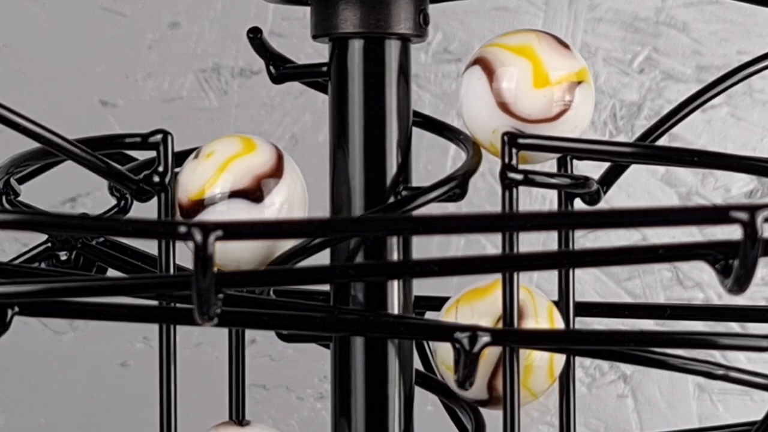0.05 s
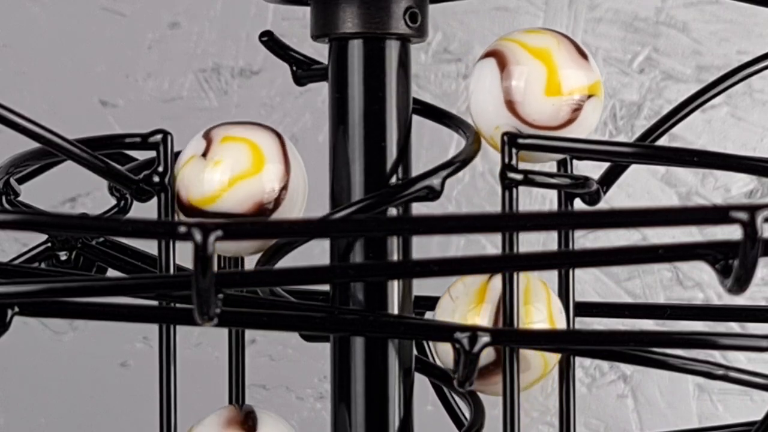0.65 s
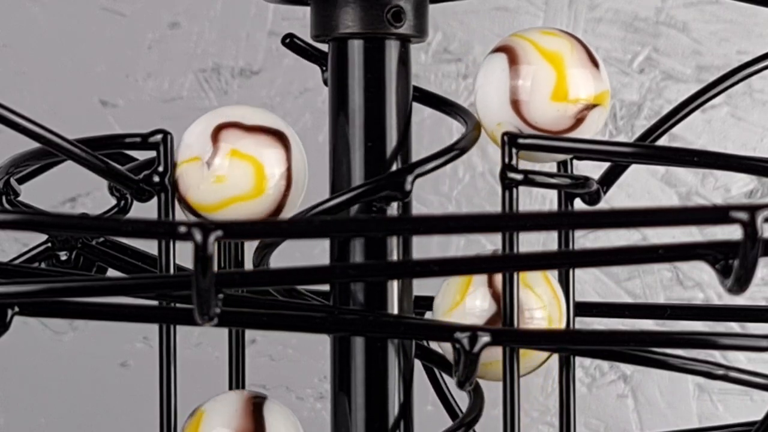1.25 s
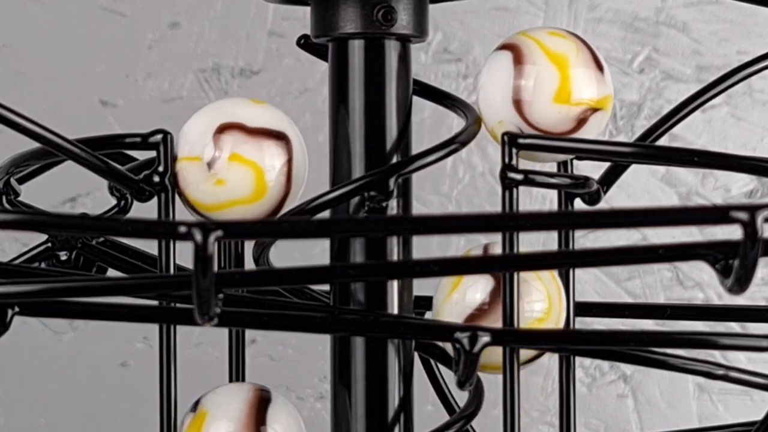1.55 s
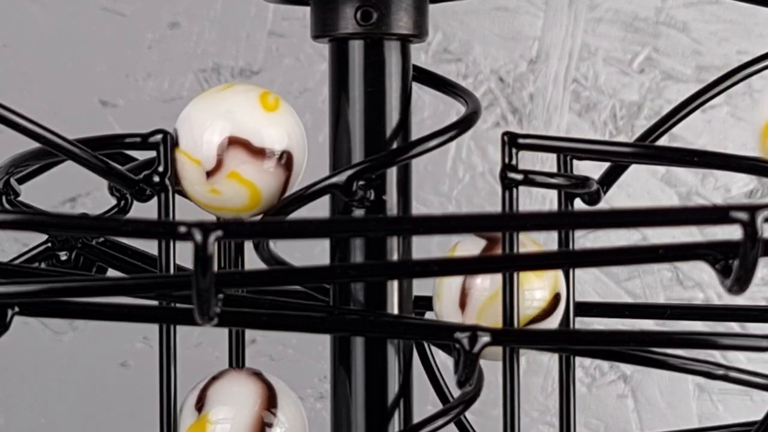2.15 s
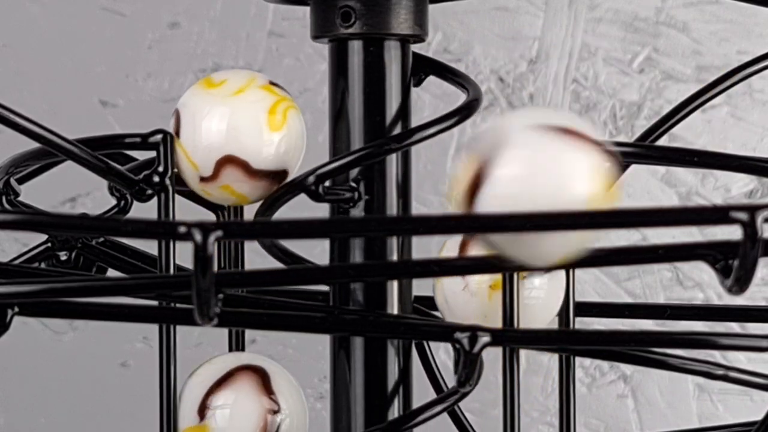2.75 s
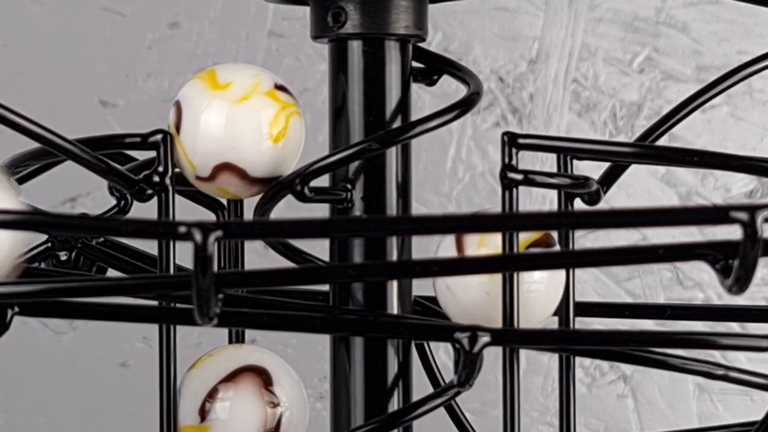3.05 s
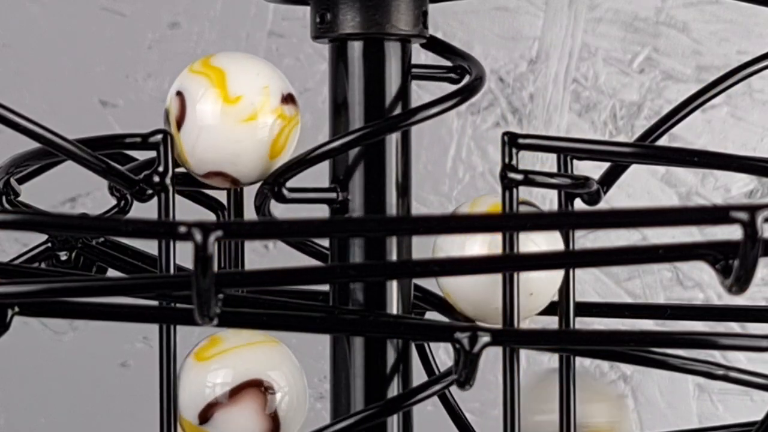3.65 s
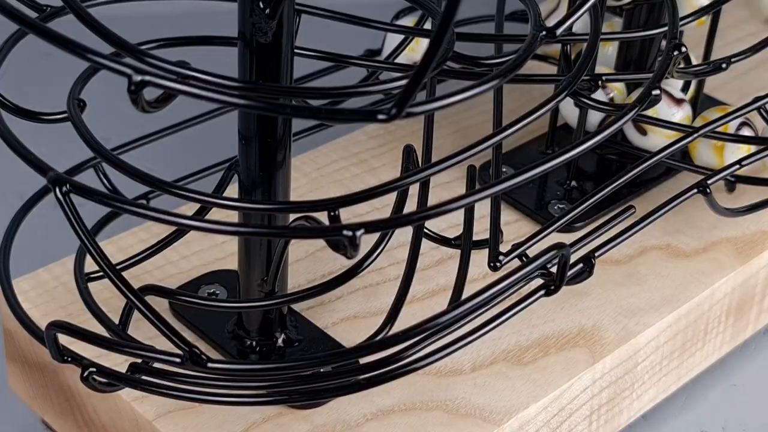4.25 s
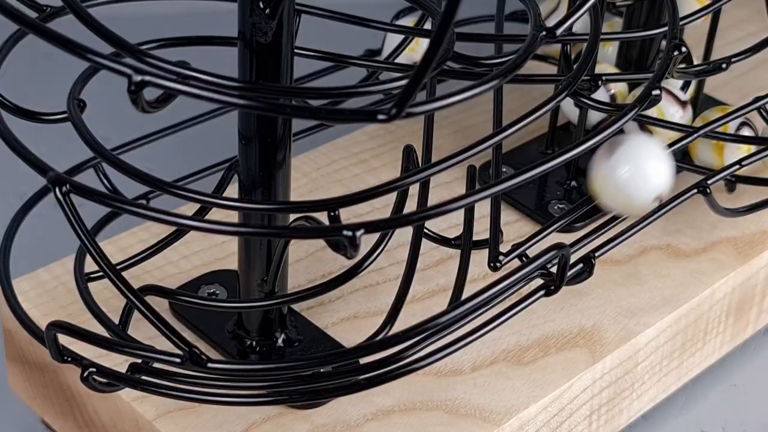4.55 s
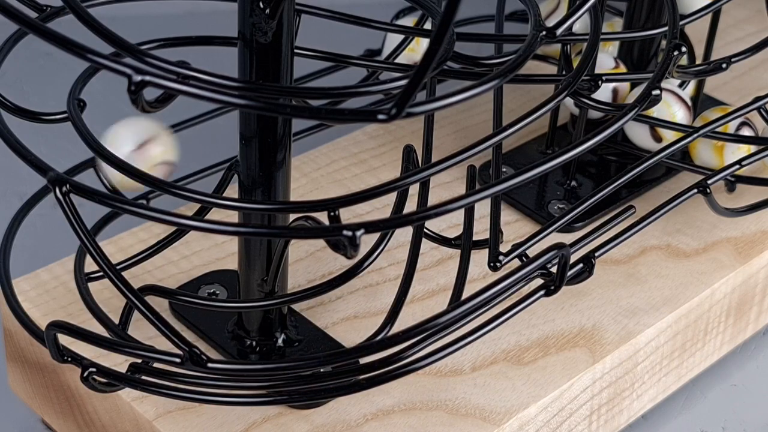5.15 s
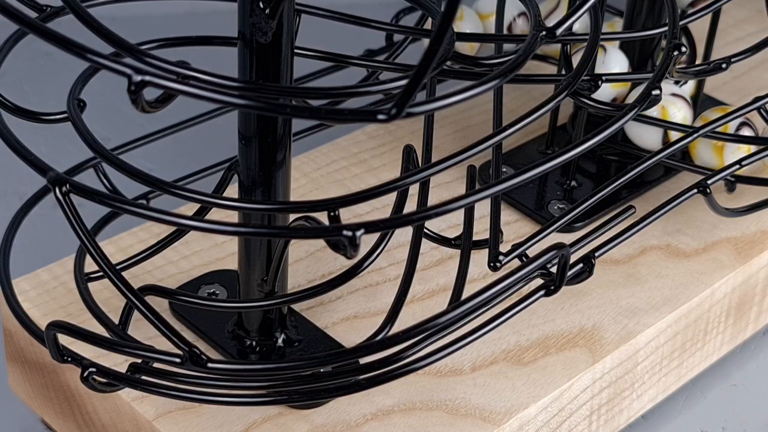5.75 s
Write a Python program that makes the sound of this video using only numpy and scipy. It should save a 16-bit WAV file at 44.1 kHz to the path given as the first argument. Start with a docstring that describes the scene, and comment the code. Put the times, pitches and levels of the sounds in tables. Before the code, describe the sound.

Glass marbles clack sharply, then roll along a wire track, whirring and rattling ever louder over a faint motor hum.

```python
"""Sharp clacks come first: glass marbles drop and meet on a steel wire track, close by in a small room.
Rolling over the rough rails, they whirr, swell in the bends and chatter across the welded joints.
Each contact excites the modes of the wire frame, and the wooden board beneath rumbles in forced vibration.
The geared motor of a screw lift hums faintly throughout; twice a marble tips gently onto or off the lift.
The rolling grows louder in the second half and ends in more clacks."""
import sys
import numpy as np
from scipy import signal
from scipy.fft import rfft, irfft
from scipy.io import wavfile
from scipy.ndimage import uniform_filter1d

SR = 44100
rng = np.random.default_rng(int(sys.argv[2]) if len(sys.argv) > 2 else 0)


def write(x):
    x = np.atleast_2d(x).T
    wavfile.write(sys.argv[1], SR, np.round(np.clip(x, -1, 1) * 32767).astype(np.int16))


N = 260190
TIME = np.arange(N) / SR


def undb(db):
    """Amplitude ratio of a level in decibels."""
    return 10 ** (np.asarray(db) / 20)


def unit(x):
    """Normalisation to an rms of 1."""
    return x / np.sqrt(np.mean(x ** 2))


def on_log_axis(hz, points):
    """Interpolation of (frequency [Hz], value) points over log frequency."""
    at, value = np.transpose(points)
    return np.interp(np.log(hz + 1), np.log(at), value)


def through(x, response):
    """Convolution with an impulse response, channel by channel."""
    return signal.fftconvolve(np.atleast_2d(x), np.atleast_2d(response), axes=1)[:, :np.shape(x)[-1]]


def colour(x, points, size=4096):
    """Minimum-phase filtering by a curve of (frequency [Hz], gain [dB]) points."""
    gain = undb(on_log_axis(np.fft.rfftfreq(size, 1 / SR), points))
    cepstrum = irfft(np.log(gain))
    cepstrum[1:size // 2] *= 2
    cepstrum[size // 2 + 1:] = 0
    return through(x, irfft(np.exp(rfft(cepstrum))))


def fade(t, t60):
    """Exponential decay, 60 dB down at t60."""
    return np.exp(-np.log(1000) * t / t60)


def wander(per_s):
    """Slow random fluctuation with a spread near 1."""
    knots = rng.standard_normal(2048)
    return np.interp(TIME * per_s, np.arange(len(knots)), knots)


def stereo_noise(size, side_db=1.3):
    """Partly correlated white noise, set by its side-to-mid ratio."""
    mid, side = rng.standard_normal((2, size))
    return unit(np.array([mid + undb(side_db) * side, mid - undb(side_db) * side]))


def add(out, s, sound):
    """Superposition of a sound starting at time s."""
    start = max(int(s * SR), 0)
    out[:, start:start + sound.shape[1]] += sound[:, :N - start]


def ring(x, modes):
    """Modal resonance: each mode is a damped cosine whose bandwidth sets its decay."""
    t = TIME[:SR // 2]
    response = sum(undb(db) * 2 * np.pi * width / SR * np.exp(-np.pi * width * t)
                   * np.cos(2 * np.pi * hz * t) for hz, width, db in modes)
    return through(x, response)


def blow(t60, rise_s=0.00032):
    """Impact transient: waves reflect to and fro in the wires as a noise burst of unit energy."""
    t = TIME[:SR // 8]
    return unit(stereo_noise(len(t)) * fade(t, t60) * (1 - np.exp(-t / rise_s))) / np.sqrt(len(t))


def taps(size, per_s, scatter_db, t60=0.05):
    """Shot noise: tiny impacts of random time and strength, each a short burst."""
    struck = rng.random(size) < per_s / SR
    strength = undb(scatter_db * rng.standard_normal(size).clip(-2, 2))
    energy = through(struck * strength ** 2, fade(TIME[:SR // 20], t60) ** 2)
    return np.sqrt(np.abs(energy)) * stereo_noise(size)


# Impacts of glass on glass or steel: (time [s], level [dB], body re treble [dB], room send [dB])
CLACKS = [(0.0004, -11.5, 0, 7), (0.0054, -4.5, -2, -11), (0.1275, -10, 2.5, -2.5),
          (0.2832, -11, 0.5, -1.5), (0.5538, -7, 1, 3.5), (0.557, -4.5, -11, -12), (5.412, -5, -10.5, -6),
          (5.598, -7.5, 3, -1.5), (5.6347, -5, 1.5, -5)]
# Spectrum of a clack: (frequency [Hz], gain [dB])
CLACK_COLOUR = [(150, -43.5), (400, -18), (540, -19), (680, -5), (900, -15.5), (1300, -3.5), (1650, -6),
                (1950, -8.5), (2700, -3), (4000, -4), (6500, -0.5), (8200, -4.5), (10000, -10),
                (16000, -20)]
# Thinning of the direct click; the low knock comes later, from frame and room: (frequency [Hz], gain [dB])
DIRECT_COLOUR = [(700, -11.5), (1500, -3.5), (4000, -3)]

def clacks(gain_db=14.5, room_db=-2.5, pan_db=-0.1, crack_db=-0.5, echo_delay_s=0.005):
    """Hard impact: a broadband crack and short ringing; returns the direct sound and the room's feed."""
    direct, to_room = np.zeros((2, 2, N))
    for s, db, body_db, send_db in CLACKS:
        tilt = [(1600, body_db), (5000, 0)]
        crack = undb(crack_db) * blow(t60=0.02, rise_s=0.0006)
        add(direct, s, colour(crack + blow(t60=0.058), tilt) * undb(db + gain_db))
        contact = colour(signal.unit_impulse(SR // 8), tilt)
        add(to_room, s + echo_delay_s, contact * undb(db + gain_db + room_db + send_db))
    direct = colour(direct, DIRECT_COLOUR) * undb(np.array([[pan_db], [-pan_db]]) / 2)
    return colour(direct, CLACK_COLOUR), colour(to_room, CLACK_COLOUR)


# Modes of the wire frame: (frequency [Hz], bandwidth [Hz], gain [dB])
WIRE_MODES = [(1184, 70, 4.5), (1331, 40, 6), (1405, 70, 1.5), (1611, 53, 7), (1691, 24, 6), (2261, 30, 9),
              (2404, 45, 6.5), (2637, 55, 5), (3010, 51, 4), (3930, 25, 1), (6220, 45, 3), (7080, 35, 0.5),
              (8350, 25, 1)]

def wire_frame(x, count=40, overtone_width_hz=20, overtone_db=3.5):
    """Resonance: the frame rings at its modes, and each length of wire adds a thin treble overtone."""
    overtones_hz = 3300 + 12000 * (np.arange(count) + rng.random(count)) / count
    return ring(x, WIRE_MODES + [(hz, overtone_width_hz, overtone_db) for hz in overtones_hz])


# Reverberation of room and frame: (frequency [Hz], 60 dB decay time [s])
ROOM_T60 = [(200, 0.94), (500, 0.78), (1100, 0.51), (3000, 0.35), (7500, 0.33), (14000, 0.25)]

def room_response(build_s=0.0026):
    """Diffuse field: a tail of unit energy builds up briefly, and its treble decays first."""
    t = TIME[:SR * 3 // 4]
    hz, frame_s, bins = signal.stft(stereo_noise(len(t), side_db=-1), SR)
    decay = fade(frame_s, on_log_axis(hz, ROOM_T60)[:, None])
    tail = signal.istft(bins * decay, SR)[1][:, :len(t)]
    return unit(tail * (1 - np.exp(-t / build_s))) / np.sqrt(len(t))


def room(x, places=5):
    """Reflections depend on source position: as the marbles move, echo patterns blend at equal power."""
    shares = np.array([wander(10) for _ in range(places)])
    shares /= np.sqrt(np.sum(shares ** 2, axis=0))
    return sum(through(x * share, room_response()) for share in shares)


# Stretches of rolling at rising or falling speed:
# (start [s], end [s], start level [dB], end level [dB], rumble re whirr [dB])
RUNS = [(0, .5, -57, -63, 2), (.59, 0.756, -62, -69, 18), (2.25, 2.38, -75, -73, 7),
        (2.378, 3.78, -67, -61, -3), (3.812, 5.902, -51, -55, -2)]
# Bends, where the marble presses harder on the rails: (centre [s], length [s], swell [dB])
BENDS = [(2.42, 0.073, 7.5), (2.976, 0.108, 4.5), (3.115, 0.12, 10), (3.53, 0.29, 5), (3.683, 0.27, 2.5),
         (3.95, 0.23, 5.5), (4.355, 0.27, 9), (4.75, 0.076, 4), (4.898, 0.17, 11), (5.053, 0.034, 14),
         (5.217, 0.26, 8)]
# Smooth stretches, where the glass stops skipping: (centre [s], length [s], level change [dB])
LULLS = [(4.49, .07, -15), (4.635, 0.058, -6), (5.28, 0.04, -9), (5.0, 0.046, -12), (5.1, 0.048, -18)]

def rolling_gains(onset_s=0.08, settle_s=0.16, bend_rumble_share=0.72):
    """Rolling noise grows with speed and contact force; returns the envelopes of whirr and rumble."""
    whirr, rumble = np.zeros((2, N))
    for start, end, start_db, end_db, rumble_db in RUNS:
        on_track = np.interp(TIME, [start - onset_s, start, end, end + settle_s], [0, 1, 1, 0]) ** 2
        gain = on_track * undb(np.interp(TIME, [start, end], [start_db, end_db]))
        whirr = np.maximum(whirr, gain)
        rumble = np.maximum(rumble, gain * undb(rumble_db))
    bend_db = swells(BENDS)
    return whirr * undb(bend_db + swells(LULLS)), rumble * undb(bend_rumble_share * bend_db)


def swells(rows):
    """Sum of Gaussian level changes, in decibels."""
    return sum(db * np.exp(-(2 * (TIME - s) / length) ** 2) for s, length, db in rows)


# Spectra of the fine whirr and of the bright skipping: (frequency [Hz], gain [dB])
WHIRR_COLOUR = [(100, -29), (430, -12), (530, -23), (660, -2), (900, -13.5), (1180, -3.5), (1700, -4),
                (1950, -9), (2300, -9), (3050, -10), (3500, -20.5), (6000, -29), (12000, -56.5)]
RATTLE_COLOUR = [(1000, -45.5), (2500, 0), (4300, 5), (7000, -1.5), (8500, -7), (9500, -12.5), (12500, -13),
                 (16000, -29)]

def rails(whirr, fine_db=-8, rattle_db=-18, hop_db=-2, brisk_db=-50, skip_growth=0.46, waver_db=3.6):
    """Roughness excitation: the rails' coating taps the rolling glass, which skips and hops at speed."""
    pressure = undb(waver_db * wander(45))
    fine = unit(colour(taps(N, per_s=1400, scatter_db=7.5), WHIRR_COLOUR))
    skips = unit(colour(taps(N, per_s=520, scatter_db=5), RATTLE_COLOUR))
    hops = unit(colour(taps(N, per_s=38, scatter_db=3, t60=0.02), RATTLE_COLOUR))
    skip_share = undb(rattle_db) * (whirr / undb(brisk_db)) ** skip_growth
    return pressure * whirr * (undb(fine_db) * fine + skip_share * (skips + undb(hop_db) * hops))


def shake_gain(attack_s=0.017, hold_s=0.046, t60=0.93, clack_db=-38.5, bump_db=-12.5):
    """Incoherent summation: blows shake the board in proportion to their body, and the energies add."""
    t, energy = TIME[:SR], np.zeros((1, N))
    envelope = np.clip(t / attack_s, 0, 1) * fade(np.maximum(t - attack_s - hold_s, 0), t60)
    for blows, shake_db in ((CLACKS, clack_db), (BUMPS, bump_db)):
        for s, db, body_db, _ in blows:
            add(energy, s, (undb(db + body_db + shake_db) * envelope[None]) ** 2)
    return np.sqrt(energy[0])


# Modes of the board and its column: (frequency [Hz], bandwidth [Hz], gain [dB])
BOARD_MODES = [(75, 18, -11.5), (105, 20, -4), (134.84, 3.3, 5.5), (234.9, 9, -7), (262, 26, -12),
               (409.5, 30, -10)]
# Wide lower loops, which boom once a marble reaches them: (frequency [Hz], bandwidth [Hz], gain [dB])
LOWER_LOOP_MODES = [(156.4, 7.8, -0.5), (188, 7.1, -3)]

def board(rumble, shake, gain_db=-2, pan_db=-1, shake_db=-5, sway_db=-5.5, sway_hz=134.5, loops_s=3.47):
    """Forced vibration: rolling and blows drive the board; once struck, the column also sways freely."""
    force = stereo_noise(N, side_db=-16)
    boom = ring(force, BOARD_MODES) + ring(force * (TIME > loops_s), LOWER_LOOP_MODES)
    boom = colour(boom, [(30, -9.5), (65, 6.5), (230, 6), (320, -8.5), (450, -7.5), (900, -31)])
    # the load on the rails is steady, so chance swells are evened out
    running_rms = np.sqrt(uniform_filter1d(np.mean(boom ** 2, axis=0), size=SR // 10))
    forced = boom / running_rms * np.hypot(rumble, undb(shake_db) * shake)
    sway = undb(sway_db) * shake * np.sqrt(2) * np.sin(2 * np.pi * sway_hz * TIME + 0.5 * wander(7.3))
    return (forced + sway) * undb(gain_db + np.array([[pan_db], [-pan_db]]) / 2)


# Tones of shaft and gears: (frequency [Hz], level [dB])
MOTOR_LINES = [(66, -84), (134, -79.5), (1306, -71.5), (2236, -78), (4619, -99)]
# Spectra of the grinding teeth and of the brush hiss: (frequency [Hz], gain [dB])
GEAR_COLOUR = [(30, -24), (75, 4), (140, 5.5), (330, -9.5), (520, -8.5), (680, 2), (980, -14.5),
               (1330, 4.5), (1700, 1), (1950, -20.5), (2230, 4), (2450, -15), (3000, -9.5), (4000, -32)]
BRUSH_COLOUR = [(2500, -14.5), (4500, 6), (5700, -5), (6900, 8), (7600, -4), (8600, -37), (16000, -13.5)]

def motor(gear_db=-69, brush_db=-83, speed_waver=0.0009, flutter_db=1):
    """Rotation gives a line spectrum that wavers with the load, over friction noise of teeth and brushes."""
    shaft_time = np.cumsum(1 + speed_waver * wander(13)) / SR
    lag_s = np.array([[0], [0.00015]])  # left, right
    tones = sum(undb(db - flutter_db * wander(33)) * np.sqrt(2)
                * np.sin(2 * np.pi * hz * (shaft_time - lag_s)) for hz, db in MOTOR_LINES)
    gears = unit(colour(stereo_noise(N, side_db=0.5), GEAR_COLOUR))
    gears *= undb(gear_db + 1.5 * wander(25.08))
    brushes = unit(colour(stereo_noise(N, side_db=-2.5), BRUSH_COLOUR))
    brushes *= undb(brush_db + 1.4 * wander(60))
    return tones + gears + brushes


# A marble tips onto or off the lift: (time [s], level [dB], treble gain [dB])
LIFT_KNOCKS = [(0.94, -39, -12), (1.9245, -30, 0)]
# Modes of the wire cradle at the end of the lift: (frequency [Hz], bandwidth [Hz], gain [dB])
CRADLE_MODES = [(678, 19, 6), (1098, 26, -0.5), (1312, 37, 2), (1655, 40, 0), (2760, 50, -10),
                (3020, 74, -5)]

def lift_knocks(thud_db=-6):
    """Impulse response: one gentle tap sets the cradle ringing over a dull thud."""
    out, size = np.zeros((2, N)), SR // 8
    ringing = unit(ring(signal.unit_impulse(size), CRADLE_MODES))
    for s, db, treble_db in LIFT_KNOCKS:
        thud = colour(blow(t60=0.07, rise_s=0.002), [(350, -20), (800, 0), (2700, 0), (6000, -25)])
        tap = colour(ringing + undb(thud_db) * unit(thud), [(700, 0), (3200, treble_db), (9000, -30)])
        add(out, s, undb(db) * tap / np.sqrt(size))
    return out


# Ringing resonances of the rolling, strongest near 3 kHz, heard from 1.9 s until the brief dip at 3.79 s:
# (frequency [Hz], bandwidth [Hz], gain [dB])
ROLLING_MODES = [(656, 33, 0.5), (1307, 18, 4.5), (1673, 25, -2.5), (2976, 93, 8.5), (3180, 41, 2),
                 (4230, 310, -1.5)]

def rolling_resonance(x, start_s=1.9, end_s=3.788, swell_db=6.5, swells_per_s=20):
    """Resonance: from start_s to end_s, x also drives ringing modes that each swell and fade at random."""
    drive = x * ((TIME > start_s) & (TIME < end_s))
    return x + sum(ring(drive * undb(swell_db * np.tanh(wander(swells_per_s))), [mode])
                   for mode in ROLLING_MODES)


# Bumps over the welded joints: (time [s], level [dB], body re treble [dB], 60 dB decay time [s])
BUMPS = [(2.2917, -53, -3.5, 0.29), (2.577, -53.5, 3.5, 0.17), (2.9468, -50, 3, 0.19),
         (3.11, -46, -8.5, 0.15), (3.4301, -38, -7, 0.17), (3.611, -38, -5, 0.31), (3.899, -36, -8.5, 0.35),
         (4.514, -35.5, -6, 0.26), (4.537, -37, 0.5, 0.13), (4.668, -34, -3.5, 0.18),
         (4.718, -34.5, 0, 0.38), (4.7998, -31, -16, 0.62), (4.815, -34.5, -15, 0.13),
         (4.8471, -33.5, -8, 0.08), (4.91, -30.5, 1, 0.17), (5.0197, -27.5, -5.5, 0.15),
         (5.047, -44, 16, 0.1), (5.118, -28, -6.5, 0.12), (5.212, -34, 2.5, 0.06),
         (5.2405, -33.5, -5, 0.05), (5.301, -29.5, -8.5, 0.21), (5.392, -30.5, -3, 0.25),
         (5.541, -35.5, -2.5, 0.21)]
# Spectrum of a bump: (frequency [Hz], gain [dB])
BUMP_COLOUR = [(200, -11.5), (500, -5.5), (660, 8.5), (900, -3), (1250, 9.5), (2000, 5.5), (3000, 0),
               (7500, -0.5), (9500, -5.5), (12500, -4.5), (16000, -13.5)]

def bumps(gain_db=17.5, knock_db=-11, corner_hz=3200, soft_db=-47, db_per_octave=9):
    """Inelastic bouncing: a knock, then dying chatter; a soft contact is longer, losing knock and treble."""
    out, t = np.zeros((2, N)), TIME[:SR // 3]
    for s, db, body_db, t60 in BUMPS:
        hardness = max(db - soft_db, 0) / db_per_octave  # octaves of added bandwidth
        bounces = taps(len(t), per_s=380, scatter_db=1.8, t60=0.035)
        hit = unit(bounces * fade(t, t60)) / np.sqrt(len(t))
        add(hit, 0, undb(knock_db) * min(hardness, 2) * blow(t60=0.05))
        cutoff_hz = corner_hz * 2 ** hardness
        shape = [(1500, body_db), (corner_hz, 0), (cutoff_hz, 0), (4 * cutoff_hz, -38)]
        hit = colour(colour(hit, shape), BUMP_COLOUR)
        add(out, s, undb(db + gain_db) * unit(hit) / np.sqrt(len(t)))
    return out


def scene(knock_room_db=-3, track_wire_db=-1, clack_wire_db=-4):
    """Superposition: all contacts excite one frame and one room; the brief clacks ring the frame least."""
    whirr, rumble = rolling_gains()
    direct, to_room = clacks()
    rolling = rolling_resonance(rails(whirr))
    knocks = rolling_resonance(bumps()) + lift_knocks()
    track = rolling + knocks + room((rolling + undb(knock_room_db) * knocks)[0])
    clacking = direct + room(to_room[0])
    wires = wire_frame(undb(track_wire_db) * track + undb(clack_wire_db) * clacking)
    return track + clacking + wires + board(rumble, shake_gain()) + motor()


def record(dry, dip_s=3.788, cutoff_hz=15750):
    """Attenuation and band limiting: the level dips briefly once, and a steep low-pass cuts the top."""
    dip = np.clip(np.abs(TIME - dip_s) / 0.008, 0.1, 1)
    low_pass = signal.ellip(10, 0.2, 70, cutoff_hz, fs=SR, output="sos")
    return signal.sosfilt(low_pass, dry * dip)


dry = scene()
out = record(dry)
write(out)
```